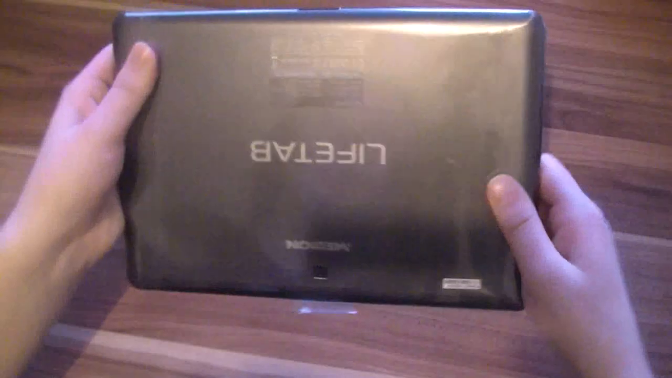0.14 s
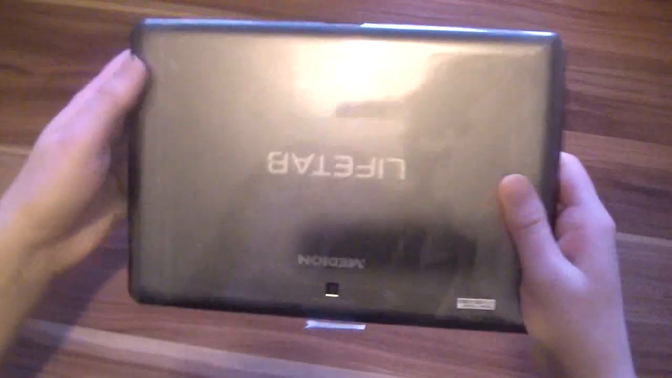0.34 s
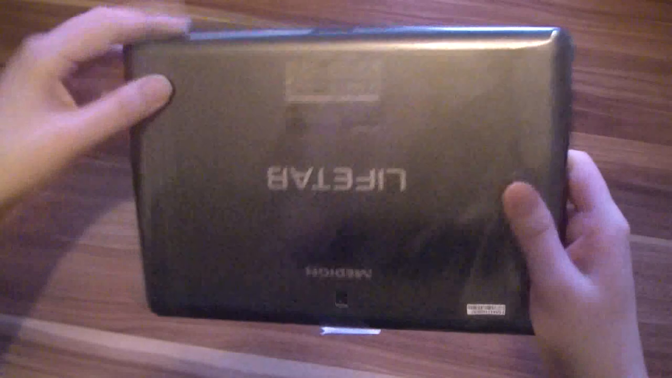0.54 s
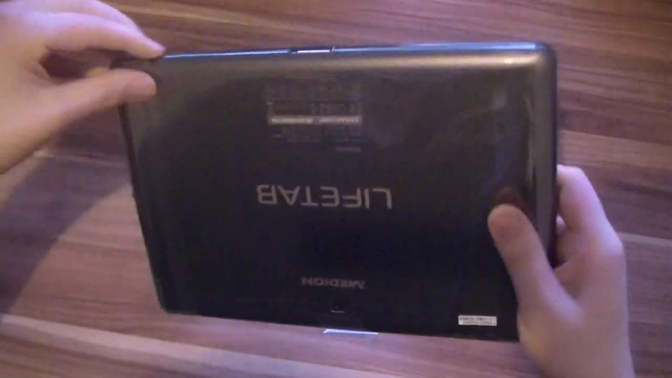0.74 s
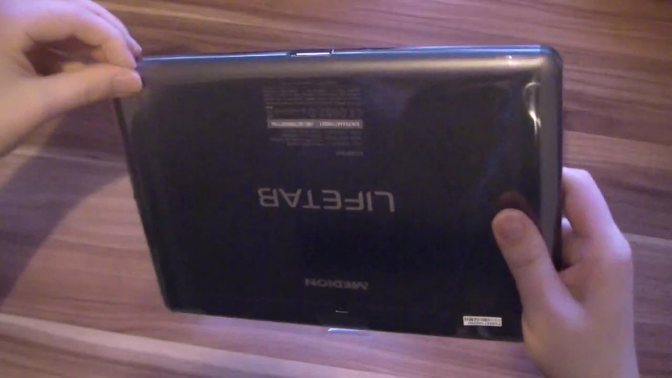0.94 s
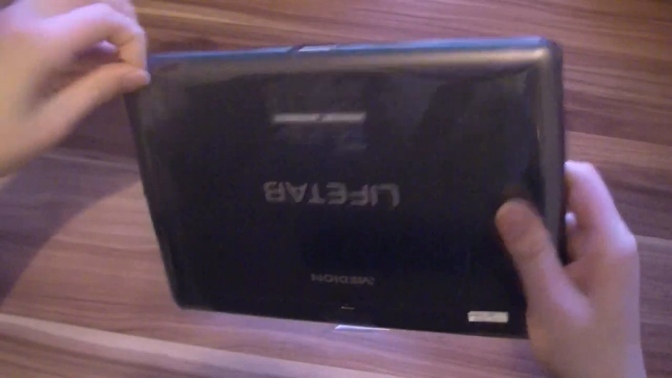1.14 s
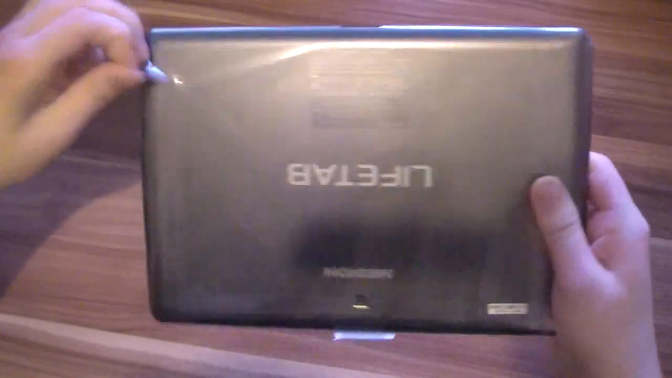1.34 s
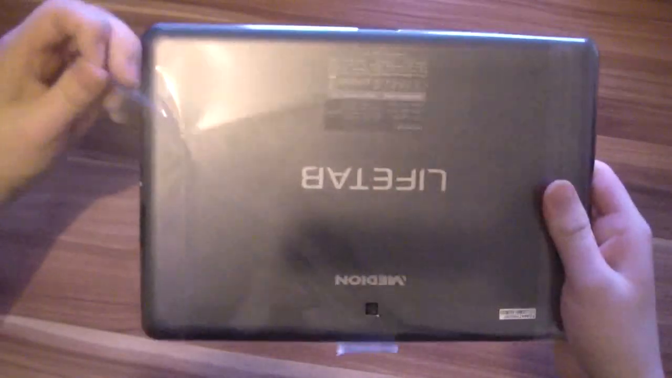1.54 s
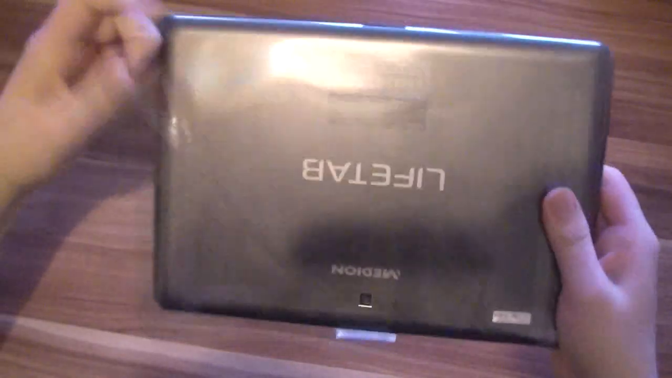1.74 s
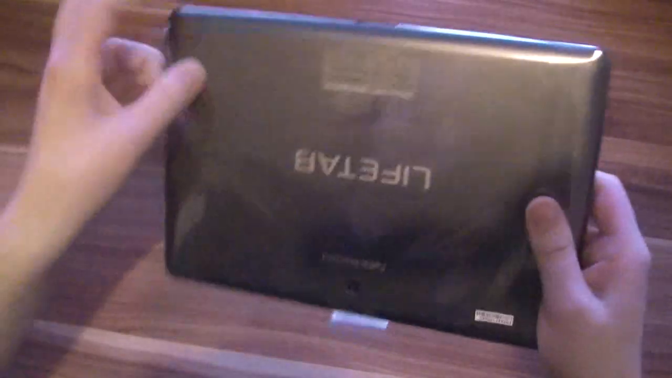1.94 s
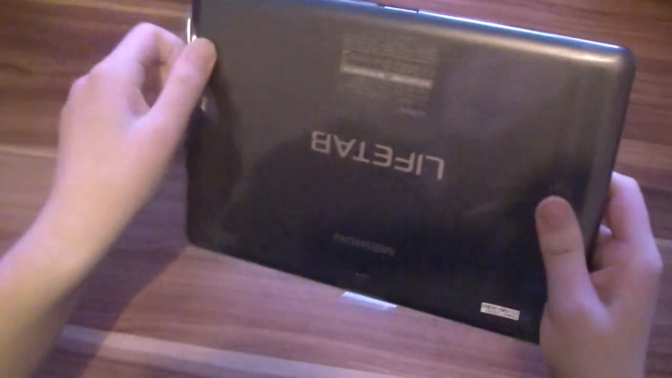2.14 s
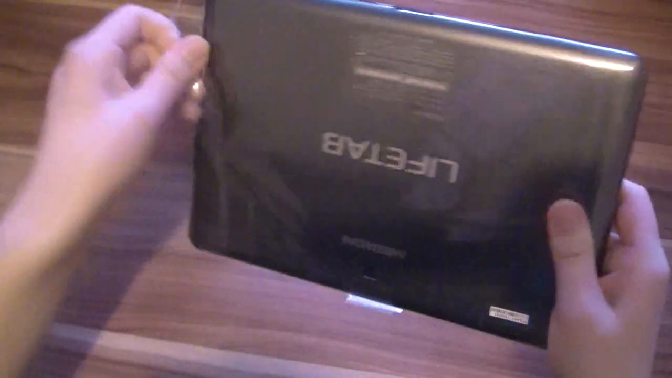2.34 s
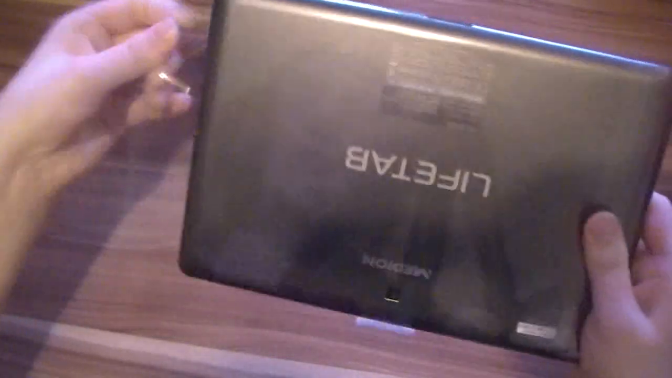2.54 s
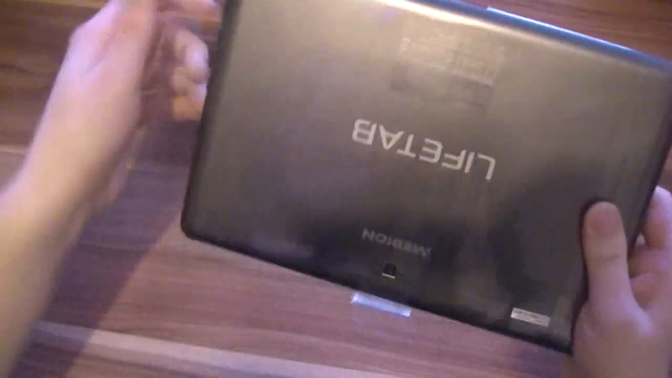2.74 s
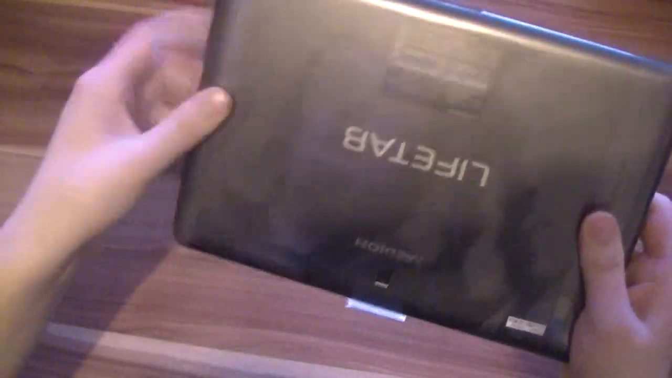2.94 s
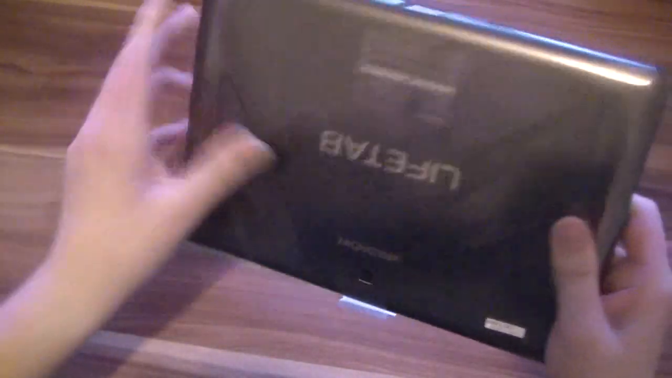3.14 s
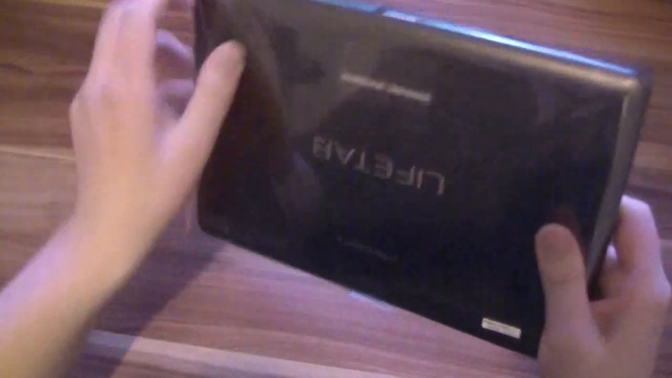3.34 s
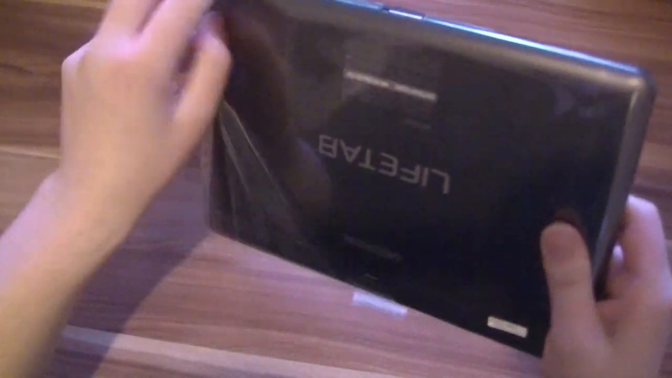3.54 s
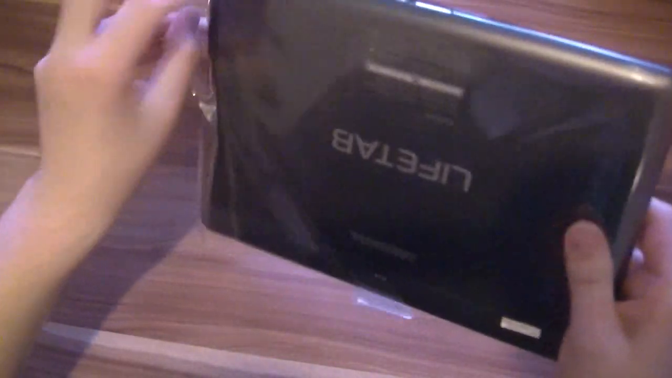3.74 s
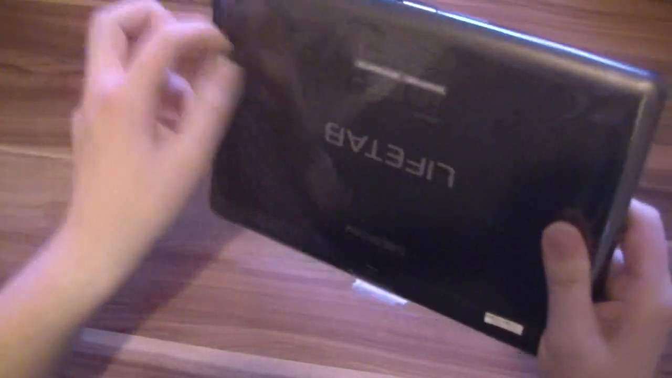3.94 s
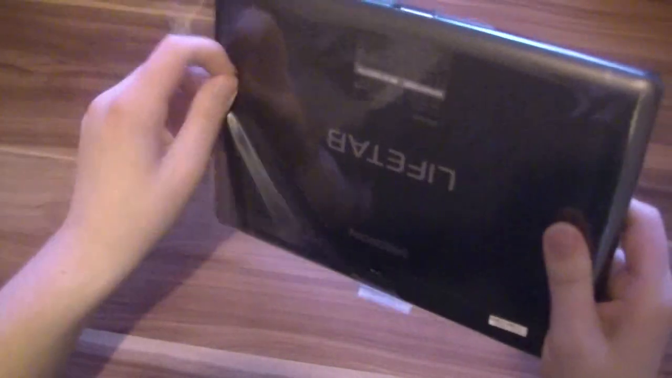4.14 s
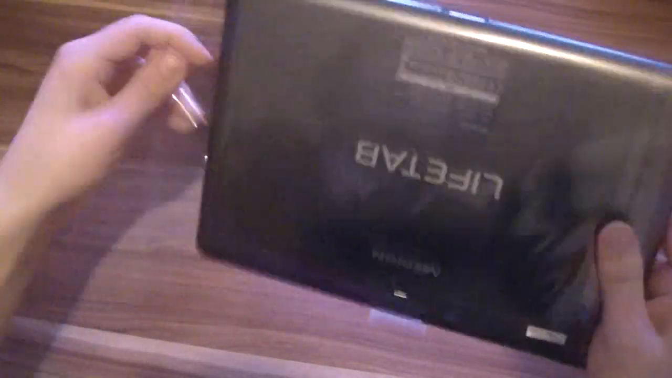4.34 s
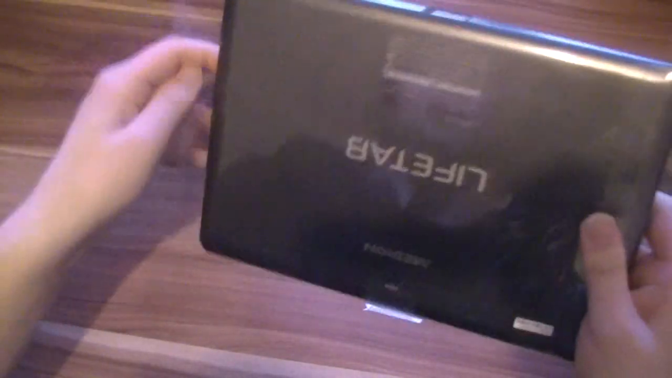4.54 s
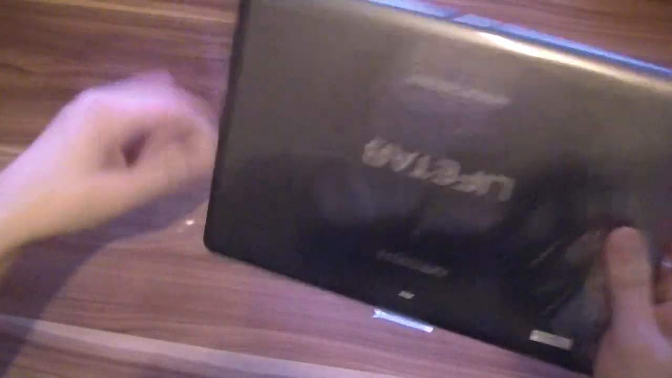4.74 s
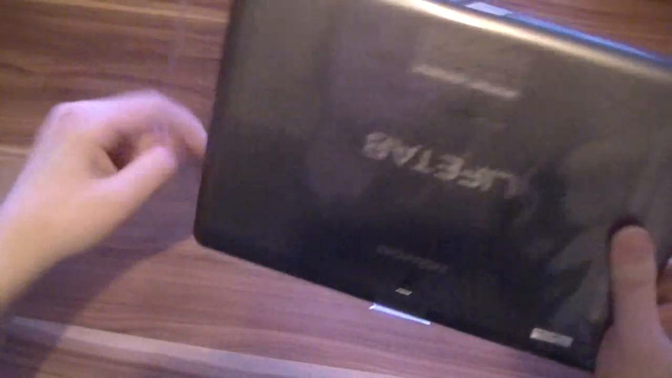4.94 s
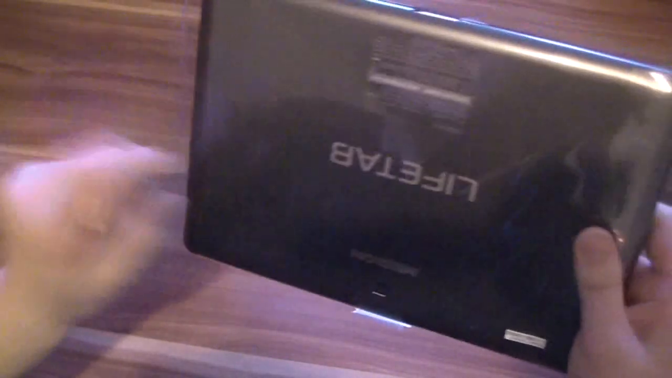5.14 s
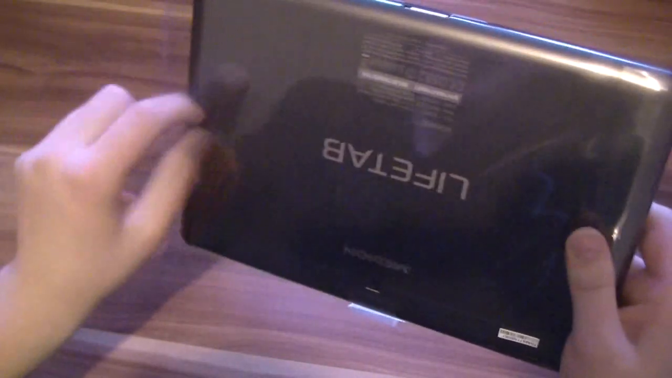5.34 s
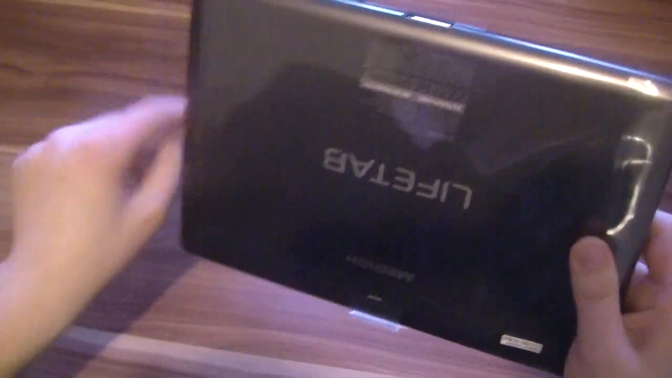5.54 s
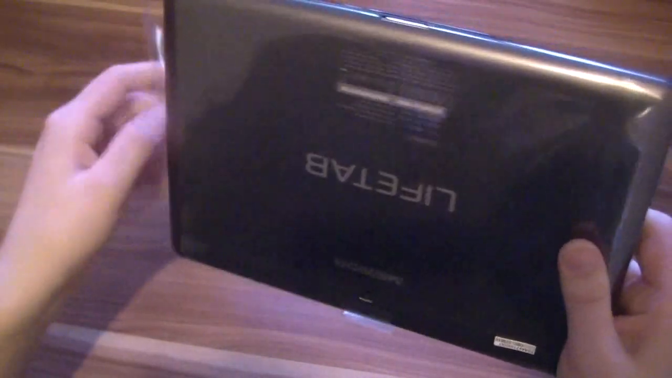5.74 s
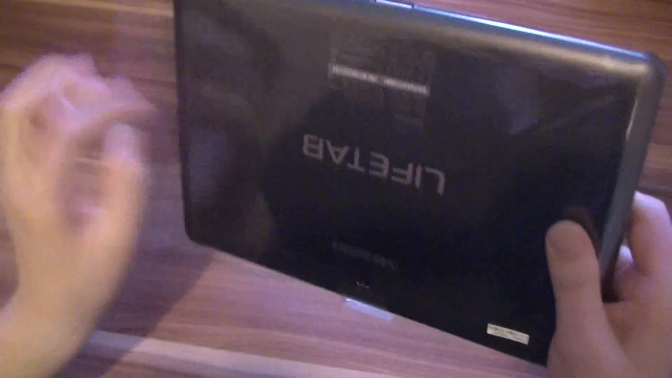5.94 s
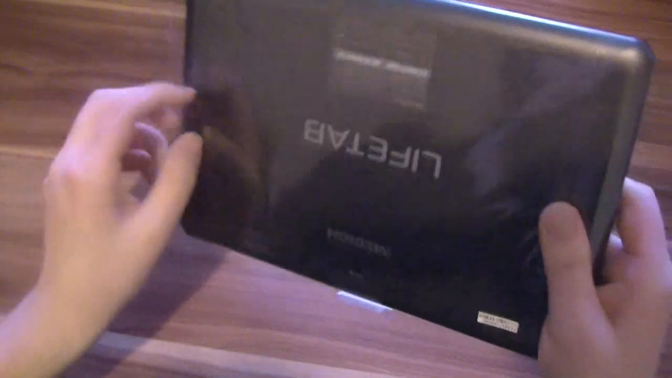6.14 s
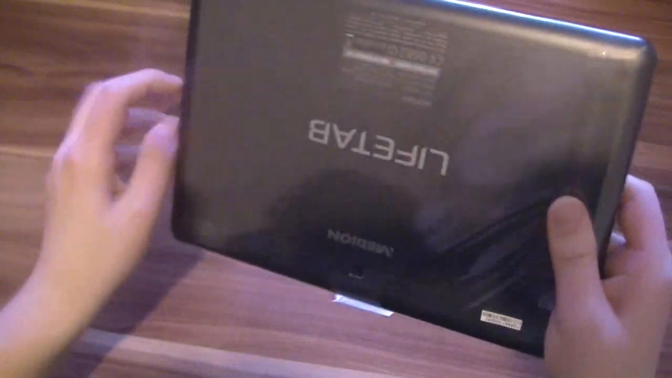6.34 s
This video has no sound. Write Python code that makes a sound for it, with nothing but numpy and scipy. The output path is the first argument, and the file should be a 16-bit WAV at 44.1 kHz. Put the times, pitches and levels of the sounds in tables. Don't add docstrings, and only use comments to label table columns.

```python
import sys
import numpy as np
from scipy import signal
from scipy.fft import rfft, irfft
from scipy.io import wavfile
from scipy.ndimage import map_coordinates

SR = 44100
rng = np.random.default_rng(int(sys.argv[2]) if len(sys.argv) > 2 else 0)


def invert_db(level):
    return 10 ** (np.asarray(level, dtype=float) / 20)


def generate_wav(signal):
    frames = np.transpose(np.atleast_2d(signal))
    scaled = np.clip(frames, -1, 1) * 32767
    pcm = np.round(scaled).astype(np.int16)
    wavfile.write(sys.argv[1], SR, pcm)


N = 281910

# low edge in Hz, high edge in Hz.
SNAP_BANDS = [(250, 1200), (1200, 3500), (3500, 8000), (8000, 14000)]


def snaps():
    # time in
    # seconds, film energy in dB, facet ring in Hz, case knock energy in dB.
    buckling_creases = [(0.0582, -33, 5430, -23.5), (0.3246, -29, 6370, -62), (0.4313, -40, 2310, -30.5),
                        (0.4967, -41, 2780, -61), (0.6006, -38, 13310, -28.5), (0.7449, -35.5, 5900, -36),
                        (1.1315, -47, 12530, -69), (1.2559, -40, 1170, -43), (1.2886, -29.5, 7700, -63),
                        (1.3856, -12.5, 7000, -58), (1.3925, -36, 9650, -59), (1.402, -27, 6100, -51),
                        (1.4096, -18.5, 6900, -37), (1.4166, -41, 6760, -36), (1.5537, -27.5, 6420, -60),
                        (1.576, -33, 8790, -48), (1.6162, -29.5, 5300, -45), (1.6858, -25, 6100, -32),
                        (1.7081, -19, 10700, -35), (1.7249, -16, 1500, -19.5),
                        (1.8966, -25, 9560, -22), (1.9143, -16, 8350, -15.5), (1.931, -12, 2840, -12.5),
                  (1.9394, -7.5, 6800, -20), (1.9468, -15, 11110, -57), (1.993, -27, 2500, -19.5),
                  (2.0212, -18.2, 1850, -19.5), (2.0692, -14, 4700, -46.5), (2.0929, -22, 1770, -17),
                  (2.134, -20.5, 2500, -27), (2.1872, -22, 4830, -38), (2.262, -29.5, 2630, -55),
                  (2.3432, -13, 5170, -35), (2.3937, -25.5, 2370, -29.5), (2.4538, 0.5, 6600, -14.5),
                  (2.4616, -15.5, 7190, -19), (2.4858, 2.5, 9300, -6), (2.4947, 6.5, 6600, -28),
                  (2.5452, -9.5, 8830, -17.5), (2.6457, -8.5, 10420, -18), (2.691, -9.5, 2580, -9.5),
                  (2.745, -21.5, 2500, -21), (2.7594, 4, 7040, -33), (2.9473, -25.5, 1210, -17),
                  (2.9853, -14.5, 6850, -20), (3.018, -7, 5650, -54),
                        (3.243, -15.5, 4340, -32), (3.32, -18, 4700, -29), (3.356, -31.5, 4600, -33),
                   (3.4899, -18.5, 4100, -25), (3.5101, -21.5, 2260, -26), (3.5403, -21.5, 12320, -37),
                   (3.5706, -0.5, 12500, -15), (3.584, -9, 2360, -18), (3.595, -8.5, 4740, -16),
                   (3.6594, -9, 4930, -21), (3.6834, -19, 1580, -29), (3.744, -1, 8650, -27),
                   (3.911, -3, 7240, -15.5), (3.9411, -30, 3020, -12), (3.952, -8, 9000, -13),
                   (3.9773, -6.5, 11920, -42), (4.0104, -25, 1300, -18.5), (4.046, -22, 3649, -22.5),
                   (4.122, -15.5, 2430, -23.5), (4.165, -17.5, 4030, -22), (4.1864, -7, 3200, -17.5),
                        (4.233, -17, 2070, -33), (4.242, -14, 7110, -25), (4.2547, 7, 5260, -31), (4.263, -1, 9700, -18),
           (4.276, -1, 8700, -22), (4.2824, 1, 3730, -12), (4.2882, -11, 8230, -6), (4.2938, 2, 2180, -2),
           (4.3446, -11, 3446, -14), (4.416, -15, 1700, -15), (4.5025, -39, 1227, -15),
           (4.5132, -2.5, 2940, -14.5), (4.5681, -29, 2820, -17), (4.5958, -10.5, 5660, -18),
           (4.6014, -8, 7400, -34), (4.6161, -9, 4970, -11.5), (4.6357, -10, 4320, -12),
           (4.7214, -22, 9780, -15), (4.749, -10, 8300, -12), (4.7524, -17, 8100, -16),
           (4.7592, -8.5, 3900, -7.5), (4.7924, -16, 2140, -10), (4.8353, -15.5, 3300, -10.5),
           (4.84, -13, 1280, -18),
                        (4.9793, -20, 8230, -20.5), (4.9901, -15.5, 6674, -17), (5.0552, -33, 7110, -43),
              (5.0619, -14, 7600, -19), (5.0863, -20.5, 3140, -46), (5.2405, -25.5, 4570, -29),
              (5.2494, -25.5, 2440, -30), (5.3073, -27, 4730, -28), (5.3149, -19.5, 2770, -22.5),
              (5.336, -21.5, 1400, -30), (5.414, -35, 6930, -27), (5.491, -29, 1192, -26),
              (5.4981, -21.5, 2820, -21), (5.5091, -20.5, 1240, -11), (5.5344, -16, 2070, -21),
              (5.5408, -21.5, 1760, -16.5), (5.5805, -19, 2670, -37), (5.589, -12.5, 8600, -10.5),
              (5.609, -17.5, 10640, -18.5),
                        (5.6977, -10.5, 5918, -22), (5.7425, -21, 3510, -22), (5.784, -30, 6200, -29),
                 (5.7956, -9.5, 4360, -23), (5.8525, -13.5, 8550, -23), (5.8619, -13, 1850, -24),
                 (5.8681, -10.5, 10000, -43), (5.8752, -21, 6800, -33), (5.9347, -17, 6600, -22),
                 (5.9834, -10, 7500, -20), (6.087, -13.5, 1940, -11.5), (6.109, -23, 6000, -41),
                 (6.1586, -24.5, 1300, -33), (6.2053, -37, 4520, -29), (6.2178, -21, 3930, -48),
                 (6.2558, -26.5, 4100, -24.5), (6.292, -25, 6940, -25), (6.3092, -23.5, 3780, -32),
                 (6.3378, -11, 1360, -33), (6.3419, -18, 1870, -29), (6.364, -19, 1230, -7)]
    fade_ms = [1.3, 1.2, .9, .8]
    rise_ms, knock_lead_ms = 0.22, 1.0
    ring_cycles, ring_share, ring_to_room = 2.3, 0.79, 0.65
    push_db = -37
    early, length = 88, 768

    creases = np.array(buckling_creases)
    start_s, film_db, facet_hz, knock_db = np.split(creases, 4, axis=1)
    gains = snap_energies(film_db[:, 0], facet_hz[:, 0], knock_db[:, 0])

    ms = (np.arange(length) - early) / SR * 1000
    draw = rng.standard_normal((len(creases), 2 * length))
    rattle = draw[:, :length] * invert_db(4.0 * draw[:, length:])
    rattle[:, early] = 3.5 * np.sign(rattle[:, early])
    step = np.sign(rattle[:, early:early + 1]) * (ms == 0)
    rattle = rattle * np.exp(np.minimum(ms, 0) / rise_ms)
    after_ms = np.maximum(ms, 0)

    kicks = np.array([rattle * np.exp(-after_ms / fade_ms[-1]), step])
    ringing = [resonance(kicks[:, i], hz, hz / (np.pi * ring_cycles)) for i, hz in enumerate(facet_hz[:, 0])]
    facet = unit(np.stack(ringing, axis=1))

    push = invert_db(push_db + film_db) * unit(band(step, 30, 150))
    shapes = np.array([push, np.zeros_like(push)])
    for k, (low, high) in enumerate(SNAP_BANDS):
        part = band(np.array([rattle * np.exp(-after_ms / fade_ms[k]), step]), low, high)
        if k == 0:
            slab = invert_db(-2.5) * band(part, 50, 303)
            part = case(part) + slab - invert_db(-5.5) * resonance(part, 1146, 250)
            part = np.roll(part, -int(knock_lead_ms * SR / 1000), axis=-1)
        else:
            part = band(part, 0.7 * low, 1.555 * high)
        rings = ring_share * ((low <= facet_hz) & (facet_hz < high))
        rings = np.array([rings, ring_to_room * rings])
        part = unit(unit(part) * (1 - rings / 2) + rings * facet)
        shapes = shapes + (-1) ** k * part * gains[:, k:k + 1]

    out = np.zeros((2, N + length))
    at = (start_s * SR).astype(int) - early + np.arange(length)
    for row in (0, 1):
        np.add.at(out[row], at, shapes[row])
    return out[:, :N]


def snap_energies(film_db, facet_hz, knock_db):
    fall_below, fall_above = -0.5, 3
    narrow_below, narrow_above = 0.19, 0.064
    centre_hz = np.sqrt(np.prod(SNAP_BANDS[1:], axis=1))
    octaves = np.log2(centre_hz / facet_hz[:, None])
    free_db = np.maximum(film_db - knock_db, 0)[:, None]
    below = fall_below + narrow_below * free_db
    above = fall_above + narrow_above * free_db
    share = invert_db(np.minimum(below * octaves, -above * octaves * np.abs(octaves) ** 0.35))
    knock = invert_db(knock_db - 4)
    film = unit(share) * invert_db(film_db - 1)[:, None]
    return np.c_[knock, film]


def flicks():
    # time in seconds, peak level in dB, ring in Hz.
    facet_flicks = [(0.3048, -53, 4980), (0.3679, -55, 7520), (0.3685, -58, 2250), (0.4965, -49.5, 2790),
                    (0.588, -56, 2620), (0.5883, -52, 9010), (0.6008, -39, 13350), (0.7464, -51, 2520),
                    (0.8985, -59, 960), (1.1412, -52, 12510), (1.3668, -50, 1580), (1.3855, -20, 7170),
                    (1.4021, -25, 7220), (1.4097, -21, 6330), (1.5538, -41, 6170), (1.7332, -40, 6760),
                    (1.8912, -45, 2690), (1.8913, -52, 8530), (1.9144, -31, 2700), (1.9262, -37, 2450),
                    (1.9268, -30, 8270), (1.9388, -30, 2790), (1.9398, -33, 6770), (2.0686, -44, 2890),
                    (2.0768, -43, 1980), (2.1268, -50, 5870), (2.1272, -48, 2700), (2.1292, -48, 5560),
                    (2.1318, -49.5, 2160), (2.1875, -40, 2360), (2.2366, -52, 3500), (2.2377, -55, 930),
                    (2.2479, -48, 8470), (2.2959, -49.5, 2660), (2.296, -41, 8600), (2.3171, -43, 9160),
                    (2.3369, -38, 10230), (2.3432, -22.5, 5110), (2.35, -41, 4660), (2.3751, -41, 6440),
                    (2.3782, -42, 10510), (2.4157, -48, 5500), (2.4157, -46.5, 1750), (2.4541, -19, 2110),
                    (2.4994, -22, 7960), (2.523, -28, 6630), (2.6642, -39, 540), (2.6892, -34.5, 500),
                    (2.6909, -33, 1800), (2.6988, -28, 6290),
                    (2.7031, -34, 613), (2.7408, -31, 2370), (2.7402, -40, 8630), (2.7563, -28, 1650),
               (2.7563, -28, 3500), (2.7619, -17, 5510), (2.9473, -48, 1490), (3.0436, -40, 5620),
               (3.1108, -49, 3040), (3.2335, -44, 3540), (3.2431, -27, 3520), (3.2719, -41, 5600),
               (3.4044, -52.5, 980), (3.5176, -47, 2060), (3.616, -43, 2160), (3.6441, -40, 4050),
               (3.659, -29.5, 2200), (3.6744, -43, 2510), (3.7441, -13, 8450), (3.7451, -26, 3200),
               (3.8709, -43, 2510), (3.8903, -46, 1690), (3.8916, -45, 8340), (3.9356, -33, 8420),
               (3.9424, -44, 2710), (3.953, -23, 8770), (3.9782, -32.5, 2450), (4.0165, -39, 1960),
               (4.0178, -37, 3940), (4.0667, -51, 680), (4.1207, -43.5, 960), (4.1221, -37, 3430),
               (4.1769, -33, 6540), (4.1861, -39, 767), (4.1936, -23.5, 7920), (4.2544, -16.5, 2430),
               (4.2639, -23, 2530), (4.2691, -16, 6790), (4.2727, -16.5, 3530), (4.2778, -23, 2390),
               (4.2775, -13, 9550), (4.287, -22, 6600), (4.2951, -27.5, 940), (4.311, -21, 3410),
               (4.4028, -40, 1040), (4.4111, -32, 3670), (4.4285, -44, 730), (4.513, -27, 1980),
               (4.5694, -42, 2700), (4.5948, -30, 3070),
                    (4.6367, -23, 4000), (4.6423, -33, 4030), (4.7067, -49, 635), (4.752, -32, 2280),
                 (4.9578, -36, 9400), (4.977, -35, 4870), (4.984, -42, 8820), (5.0482, -44, 9970),
                 (5.0545, -36, 9100), (5.0615, -38.5, 875), (5.0661, -41, 850.1), (5.0669, -37, 6900),
                 (5.2354, -56, 7870), (5.2881, -47, 6220), (5.29, -52, 2430), (5.3154, -43, 1730),
                 (5.3221, -53, 2000), (5.3651, -45, 7550), (5.3705, -48.5, 2240), (5.4997, -41, 2020),
                 (5.513, -39, 11080), (5.5708, -41, 4480), (5.5872, -37, 850), (5.5865, -27.5, 2860),
                 (5.6906, -35, 2500), (5.6972, -20.5, 6580), (5.7166, -38, 2490), (5.7429, -41, 6440),
                 (5.7656, -44, 1880), (5.786, -41, 1480), (5.8127, -38, 1320), (5.8131, -32, 5120),
                 (5.8297, -43, 1060), (5.871, -26, 9280), (5.875, -31, 2510), (5.893, -35, 3500),
                 (5.9183, -39, 3430), (5.94, -43, 905), (6.017, -49, 2030), (6.0777, -42, 3900),
                 (6.0842, -45, 3450), (6.0848, -49, 8290), (6.1406, -45, 10120), (6.1564, -45, 4150),
                 (6.165, -49, 1410), (6.205, -39, 4480), (6.2183, -37, 3470), (6.2926, -40, 3370),
                 (6.31, -44, 960), (6.3283, -44, 3100)]
    gain_db, cycles, to_room_db = 2, 1.35, -5
    click = 1. * (np.arange(512) == 0)
    out = np.zeros(N + 512)
    for s, db, hz in facet_flicks:
        width = hz / (np.pi * cycles)
        ring = resonance(resonance(click, hz, width), hz, 2 * width)
        at = int(s * SR)
        out[at:at + len(ring)] += invert_db(db + gain_db) * ring / np.abs(ring).max()
    return out[:N] * invert_db(np.array([[0], [to_room_db]]))


def rim():
    # time in seconds, peak level in dB.
    taps = [
        (1.256, -46.5),
        (2.9483, -34),
        (3.4895, -40.5),
        (3.5704, -29.5),
        (3.5959, -28),
        (3.7436, -33.5),
        (4.1862, -37),
        (5.9836, -32.5),
    ]
    hz, width = 910, 250
    s, db = np.transpose(taps)
    clicks = np.full(N, 1e-18)
    clicks[(s * SR).astype(int)] = invert_db(db) * SR / (np.pi * width)
    return resonance(resonance(clicks, hz, width), hz, 2 * width)


def rustle():
    # time in seconds, level in dB.
    handling = [(1.68, -72), (1.94, -56.5), (2.06, -56.5), (2.41, -57), (2.64, -37), (2.79, -85),
                (3.31, -55), (3.54, -90), (3.67, -63), (4.04, -60), (4.38, -93), (4.76, -41.5), (5.16, -70),
                (5.34, -74), (5.58, -54.5), (5.75, -43.5), (6.1, -63.5), (6.39, -54.5)]
    # start in seconds, length in seconds, dull level in dB,
    # bright level in dB.
    bursts = [(0.6, 0.01, -68, -57.5), (1.907, 0.028, -57, -54), (2.4935, 0.004, -29.5, -14),
              (2.56, 0.062, -51, -45), (2.298, 0.041, -101, -56), (1.308, 0.027, -60.5, -57.5),
              (0.774, 0.035, -68, -71), (0.87, 0.014, -65, -72), (2.5, 0.13, -59, -41.5),
              (3.745, 0.045, -70, -45.5), (5.862, 0.031, -46.5, -58), (3.3, 0.032, -53.5, -53.5),
              (4.5, 0.018, -48, -38), (4.259, 0.1, -37.5, -33.5), (4.744, 0.012, -30.5, -36),
              (4.84, 0.015, -36, -48), (5.049, 0.024, -45, -46.5), (5.574, 0.048, -41.5, -53),
              (5.867, 0.0084, -33, -43.5), (6.332, 0.013, -38, -53)]
    # frequency in Hz, density in dB per Hz.
    dull_colour = [(200, 3.5), (400, -19.5), (700, -23), (1500, 5.5), (3000, 3.5)]
    # frequency in Hz, density in dB per Hz.
    bright_colour = [(2500, -13), (4500, 7), (7000, 7), (10000, 5.5), (13000, 0), (16000, -30)]
    t = np.arange(N) / SR
    s, db = np.transpose(handling)
    handling_db = np.interp(t, s, db, left=-120, right=-120)
    level = invert_db(handling_db + np.array([[-7], [-6.5]]))
    for start, length, *levels_db in bursts:
        gate = np.interp(t - start, [0, .002, length, length + .003], [0, 1, .7, 0])
        level = level + invert_db(np.array(levels_db))[:, None] * gate
    creases = crackle(900, spread_db=3.5, clump_db=4.0)
    dull = 0.55 * coloured(creases, dull_colour) + 0.5 * rms_one(case(creases))
    bright = coloured(crackle(1500, spread_db=3.5, clump_db=4.0), bright_colour)
    return level[0] * dull + level[1] * bright


def peel():
    # frequency in Hz, density in dB per Hz.
    colour = [(4300, -4), (5300, -1), (6500, 4.5), (8000, -4), (9800, 0.5), (12500, -6), (16000, -12.5)]
    start, attack = 1.25, 0.037
    glide, glide_s = 0.3, 0.057
    slips = crackle(12000, spread_db=2.5, clump_db=1.5)
    after = np.maximum(np.arange(N) / SR - start - attack / 2, 0)
    read = np.cumsum(1 + glide * np.exp(-after / glide_s))
    hiss = map_coordinates(coloured(slips, colour), [read], order=3, mode="wrap")
    return invert_db(-59.5) * stroke(start, attack, hold=0.365, release=0.017) * hiss


def slide():
    # frequency in Hz, density in dB per Hz.
    skin = [(1100, -3.5), (2300, -11), (3200, -4.5), (4500, -9), (8000, -8.5), (14000, -19)]
    drag = rng.standard_normal((2, N)) * invert_db(2.4 * drift(15))
    upper = resonance(resonance(drag[0], 900, 260), 920, 260)
    body = 0.84 * rms_one(case(case(drag[0]))) + 0.31 * rms_one(upper)
    hiss = coloured(drag[1], skin)
    palm = stroke(start=0.03, attack=0.06, hold=0.09, release=0.13)
    return palm * (invert_db(-53) * body + invert_db(-59.5) * hiss)


def case(x):
    # frequency in Hz, width in Hz, level in dB.
    modes = [(274, 260, -6), (574, 207, 2), (970, 340, 0)]
    return sum((-1) ** k * invert_db(db) * resonance(x, hz, width) for k, (hz, width, db) in enumerate(modes))


def crackle(per_s, spread_db, clump_db):
    sizes = invert_db(spread_db * np.minimum(rng.exponential(1, N), 4)) * rng.choice([-1, 1], N)
    return sizes * (rng.random(N) < per_s * invert_db(clump_db * drift(25)) / SR)


def stroke(start, attack, hold, release):
    depth_db = 13
    edges = start + np.cumsum([0, attack, hold, release])
    gain_db = np.interp(np.arange(N) / SR, edges, [-depth_db, 0, 0, -depth_db], left=-120, right=-120)
    return invert_db(gain_db)


def drift(rate):
    r = np.exp(-80 * np.pi * rate / SR)
    white = rng.standard_normal(N // 40 + 2002)
    slow = signal.lfilter([1], [1, -2 * r, r * r], white)[2000:]
    return np.interp(np.arange(N) / 40, np.arange(len(slow)), rms_one(slow))


def resonance(x, hz, width):
    r = np.exp(-np.pi * width / SR)
    poles = [1, -2 * r * np.cos(2 * np.pi * hz / SR), r * r]
    return signal.lfilter(np.array([1, 0, -1]) * (1 - r * r) / 2, poles, x)


def band(x, low, high):
    return signal.sosfilt(signal.butter(2, [low, high], "band", fs=SR, output="sos"), x)


def at_hz(points, hz):
    points_hz, values = np.array(points).T
    return np.interp(np.log(hz), np.log(points_hz), values)


def coloured(x, spectrum):
    hz = np.maximum(np.arange(N // 2 + 1) * SR / N, 1)
    (low_hz, low_db), (high_hz, high_db) = spectrum[0], spectrum[-1]
    ends = [(low_hz / 2, low_db - 24), *spectrum, (high_hz * 2, high_db - 24)]
    return rms_one(irfft(rfft(x) * invert_db(at_hz(ends, hz)), N))


def rms_one(x):
    return x / np.sqrt(np.mean(x ** 2) + 1e-20)


def unit(rows):
    return rows / np.sqrt(np.sum(rows ** 2, axis=-1, keepdims=True))


def echoes(x):
    # delay in milliseconds, left level in dB, right level in dB.
    images = [
        (2.6, -12, -13),
        (6.9, -10, -9),
    ]
    lag = 0.067
    response = np.zeros((2, 1024))
    response[:, :2] = [[1 - lag, lag], [1, 0]]
    for ms, left_db, right_db in images:
        at = int(ms * SR / 1000)
        response[[0, 1], [at, at + 1]] = invert_db(np.array([left_db, right_db]))
    return signal.fftconvolve(x[None], response, axes=1)[:, :N]


def room(x):
    # frequency in Hz, T60 in seconds.
    t60 = [(200, 0.55), (600, 0.45), (2000, 0.47), (5000, 0.42), (9000, 0.32), (15000, 0.26)]
    # frequency in Hz, level against direct sound in dB.
    tail_db = [(200, 1.5), (600, -5), (2000, -2.5), (5000, -0.5), (9000, -3.5), (15000, -3.5)]
    # frequency in Hz, left-right likeness from 0 to 1.
    likeness = [(200, 0.7), (2000, 0.72), (9000, 0.13)]
    edges_hz = 25 * 2 ** np.arange(0, 9.6, .5)
    t = np.arange(int(.8 * SR)) / SR
    white = rng.standard_normal((2, 2, len(t)))
    response = np.zeros((2, len(t)))
    for k, (low, high) in enumerate(zip(edges_hz[5:], edges_hz[6:])):
        hz = np.sqrt(low * high)
        alike = np.clip(at_hz(likeness, hz), 0, 1)
        mid, side = band(white[k % 2], low, high)
        fade = invert_db(-60 * t / at_hz(t60, hz)) * (1 - np.exp(-t / 0.00012))
        gain = invert_db(at_hz(tail_db, hz)) / np.sqrt(2 * np.sum(fade ** 2))
        pair = np.sqrt(1 + alike) * mid + np.sqrt(1 - alike) * side * [[1], [-1]]
        response += gain * fade * pair
    return signal.fftconvolve(x[None], response, axes=1)[:, :N]


def whine():
    # frequency in Hz, width in Hz, level in dB.
    lines = [(517, 16, -70), (1310, 23, -77)]
    buzz = rng.standard_normal(N)
    tone = sum(invert_db(db) * rms_one(resonance(resonance(buzz, hz, w), hz, w)) for hz, w, db in lines)
    return stroke(start=2.85, attack=.15, hold=.45, release=.1) * tone


def floor():
    # frequency in Hz, density in dB per Hz.
    colour = [(30, -13.5), (60, -5), (110, -2), (200, -2.5), (400, -6), (800, -8.5), (1600, -13),
              (3200, -18.5), (5000, -24), (9000, -28), (13000, -26), (16000, -30.5)]
    # frequency in Hz, left-right likeness from 0 to 1.
    likeness = [(60, 0.21), (240, 0.099), (950, 0.12), (3770, 0.187), (15000, 0.12)]
    # frequency in Hz, width in Hz, level in dB.
    hum_lines = [(115.8, 11, -77), (150.3, 6.8, -72.5)]
    mid, side, buzz = rng.standard_normal((3, N))
    hz = np.maximum(np.arange(N // 2 + 1) * SR / N, 1)
    alike = np.clip(at_hz(likeness, hz), 0, 1)
    pair = np.sqrt(1 + alike) * rfft(mid) + np.sqrt(1 - alike) * rfft(side) * [[1], [-1]]
    hum = sum(invert_db(db) * rms_one(resonance(resonance(buzz, f, w), f, w)) for f, w, db in hum_lines)
    return invert_db(-61) * coloured(irfft(pair, N), colour) + hum


def scene():
    near, all_round = snaps() + flicks() + rim() + rustle() + peel() + slide()
    return echoes(near) + room(all_round) + floor() + whine()


def low_pass(x):
    return signal.sosfilt(signal.butter(12, 16970, fs=SR, output="sos"), x)


def record(dry):
    # frequency in Hz, gain in dB.
    capsule = [(60, -3), (1000, 0.5), (4200, -1), (6500, 0.5), (9000, 1), (14000, -2.5)]
    # frequency in Hz, left minus right in dB.
    balance = [(300, 0.5), (1500, 1.4), (5000, -0.6), (13000, -0.5)]
    hz = np.maximum(np.arange(N // 2 + 1) * SR / N, 1)
    colour_db = at_hz(capsule, hz) + at_hz(balance, hz) / 2 * np.array([[1], [-1]])
    ports = np.clip(irfft(rfft(dry) * invert_db(colour_db), N), -1, 1)
    ports = signal.sosfilt(signal.cheby2(8, 26, 16300, fs=SR, output="sos"), ports)
    return low_pass(ports)


dry = scene()
out = record(dry)
generate_wav(out)
```